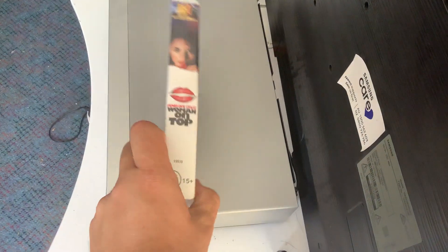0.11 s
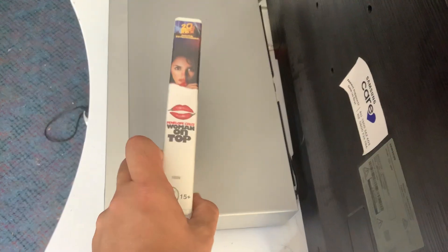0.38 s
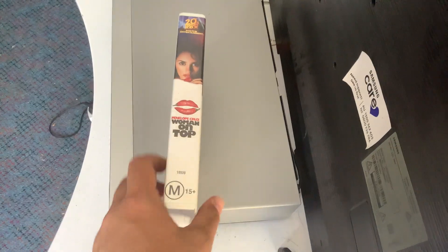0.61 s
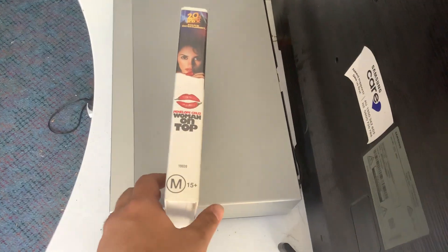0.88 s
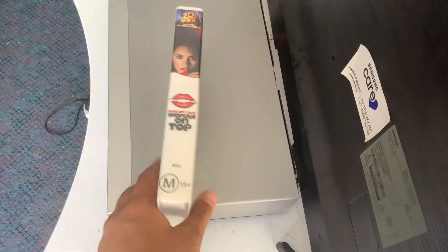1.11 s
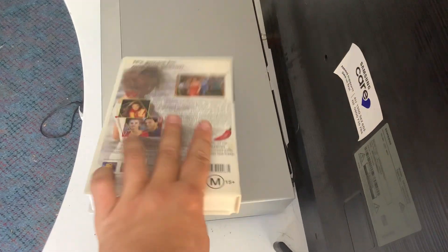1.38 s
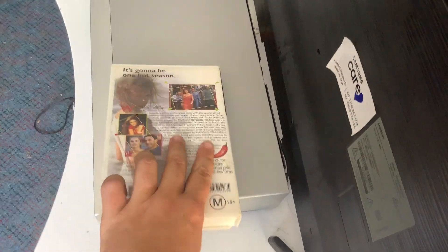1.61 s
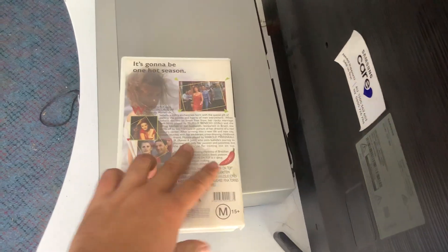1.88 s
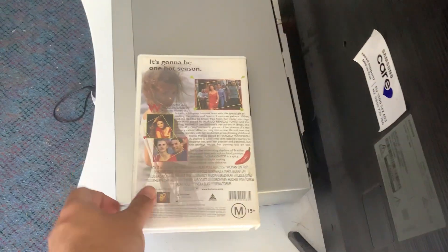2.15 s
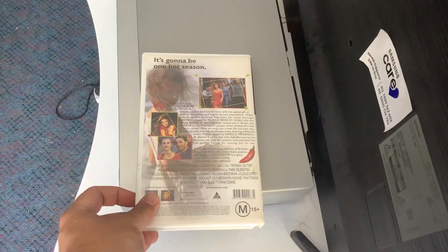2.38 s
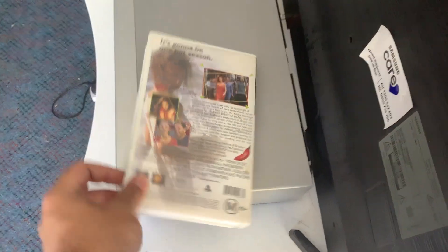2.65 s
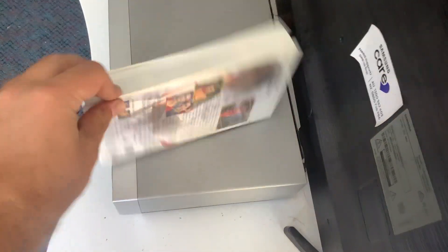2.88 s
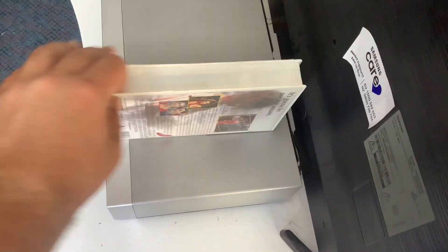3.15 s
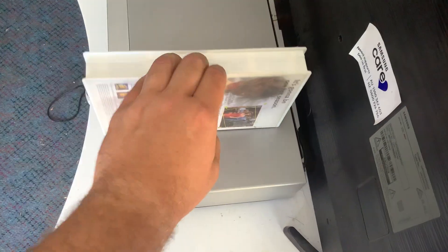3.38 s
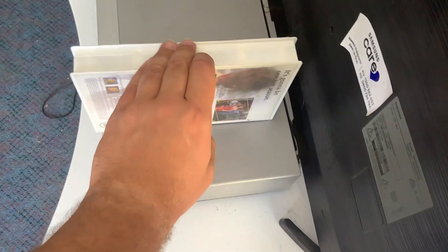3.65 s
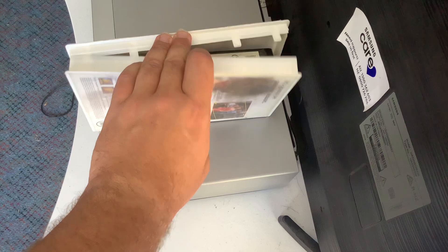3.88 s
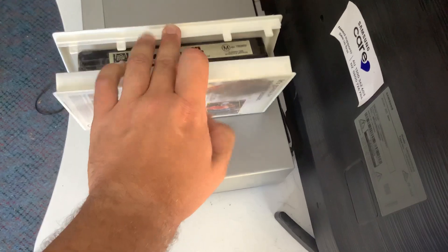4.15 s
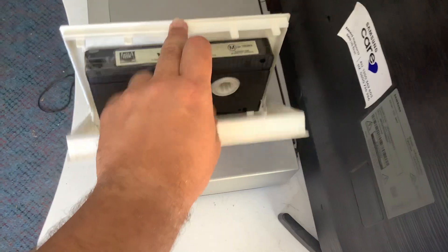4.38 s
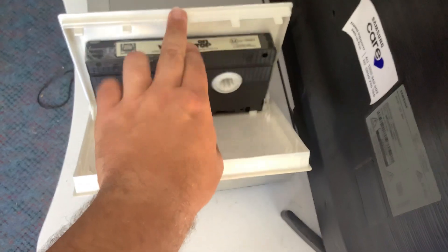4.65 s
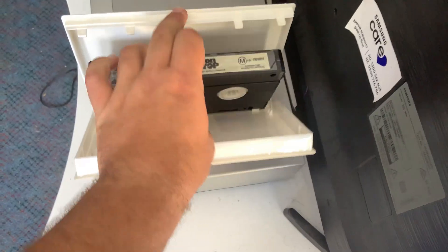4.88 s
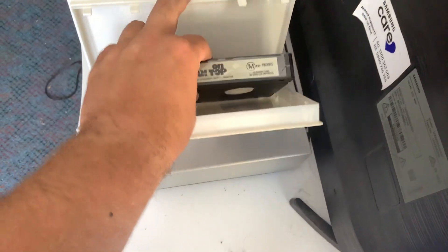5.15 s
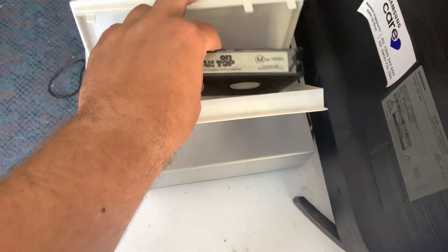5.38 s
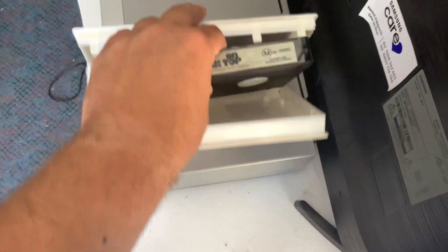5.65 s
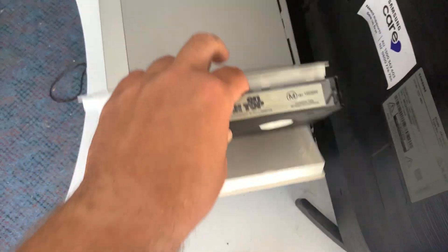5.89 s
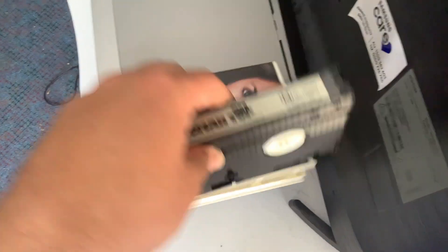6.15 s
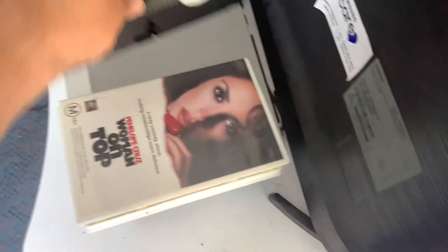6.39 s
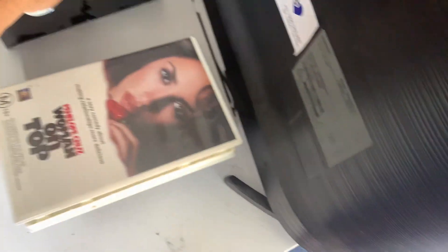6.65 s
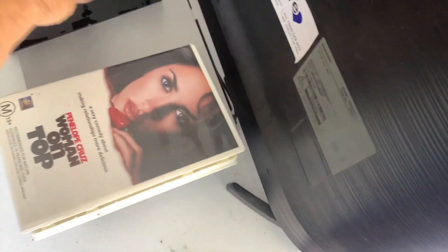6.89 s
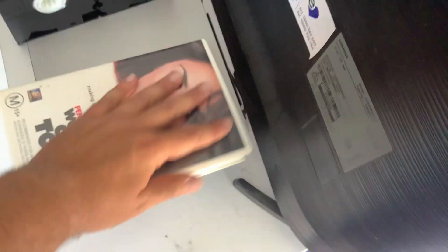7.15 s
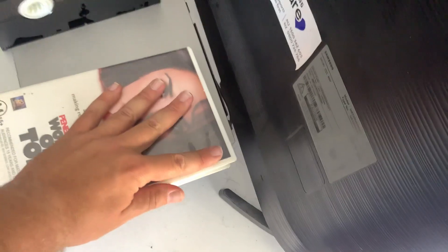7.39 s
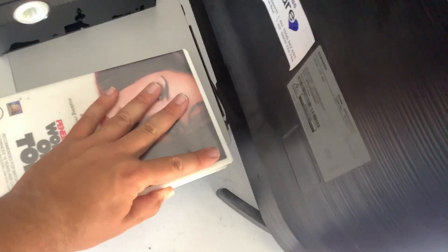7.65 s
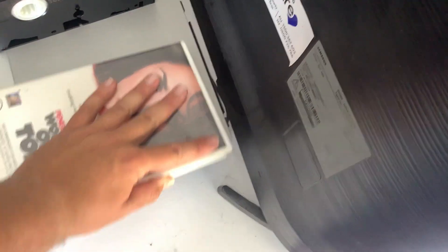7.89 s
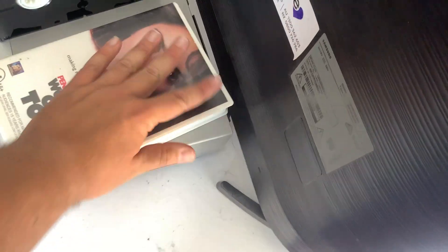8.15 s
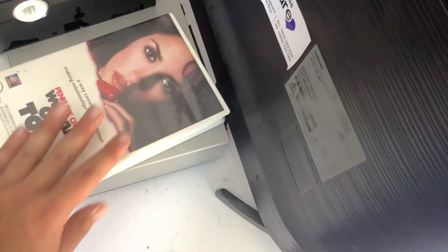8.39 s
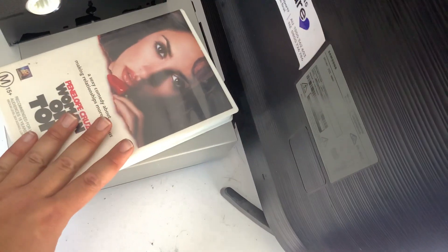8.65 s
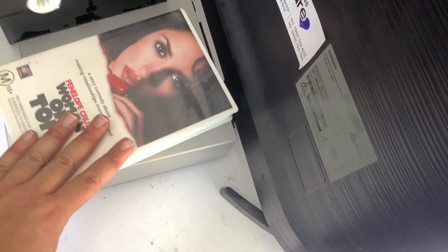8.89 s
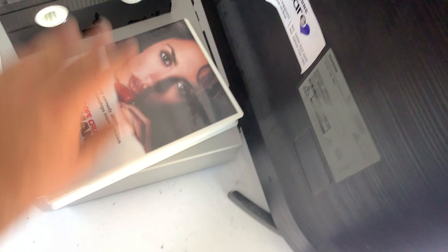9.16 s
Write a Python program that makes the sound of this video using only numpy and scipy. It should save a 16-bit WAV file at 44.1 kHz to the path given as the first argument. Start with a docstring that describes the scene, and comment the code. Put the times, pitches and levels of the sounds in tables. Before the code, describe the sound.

Close to the microphone, a hand turns a hollow plastic cassette case on a metal-cased appliance. A solid knock comes first, then soft rubs and another clack, a dense cluster of bright clacks as it is stood up and opened, light rattles, a very sharp snap as it shuts, and a few last taps. A low fan hum and faint air run throughout the small room.

```python
"""A hand turns, opens and shuts a hollow plastic cassette case on top of a metal-cased appliance in a small room.
Each contact is a short chatter of clicks that rings the hollow box low and its thin shell high.
Edges rub in between as trains of tiny catches with a hiss; snaps ring the shell, pings are treble noise.
Heavy landings shake the panel below with a few low, decaying tones, and the room answers with noise that dies away.
A fan nearby hums on a few wavering near-sines over a steady rush of air made of shaped noise."""
import sys
import numpy as np
from scipy import signal
from scipy.fft import rfft, irfft
from scipy.io import wavfile

SR = 44100
rng = np.random.default_rng(int(sys.argv[2]) if len(sys.argv) > 2 else 0)


def store_wav(level_fs):
    """Save 16-bit WAV to argv[1]."""
    pcm = np.round(np.clip(np.atleast_2d(level_fs), -1, 1) * 32767)
    wavfile.write(sys.argv[1], SR, pcm.T.astype(np.int16))


N = 409248   # length of the scene in samples


def from_db(db):
    """Gain of a level in dB."""
    return 10 ** (np.asarray(db) / 20)


def rms_one(x):
    """Scaled to rms 1."""
    return x / np.sqrt(np.mean(x ** 2) + 1e-20)


def peak_one(x):
    """Scaled to peak 1."""
    return x / np.max(np.abs(x))


def energy_one(x):
    """Scaled so that the first 30 ms have rms 1."""
    return x / np.sqrt(np.mean(x[:round(.03 * SR)] ** 2) + 1e-20)


def high_pass(x, hz):
    """Steep cut of the bass."""
    return signal.sosfilt(signal.butter(4, hz, "high", fs=SR, output="sos"), x)


def drift(rate_hz):
    """Random wandering of spread 1: noise at every 40th sample, smoothed twice; a higher rate wanders faster."""
    r = np.exp(-80 * np.pi * rate_hz / SR)
    coarse = rng.standard_normal(N // 40 + 2002)
    slow = signal.lfilter([1], [1, -2 * r, r * r], coarse)[2000:]   # leave out the filter's start
    return np.interp(np.arange(N) / 40, np.arange(len(slow)), rms_one(slow))


def coloured(x, spectrum):
    """Shapes a sound by a spectrum read on a log-frequency axis."""
    hz, db = np.transpose(spectrum)
    grid = np.maximum(np.arange(len(x) // 2 + 1) * SR / len(x), 1)
    gain = from_db(np.interp(np.log(grid), np.log(hz), db))
    return irfft(rfft(x) * gain, len(x))


def rings(modes, size):
    """One decaying sine a row, the way a struck body sounds at each of its own pitches."""
    t = np.arange(size) / SR
    return np.array([from_db(db - 60 * t / t60) * np.sin(2 * np.pi * hz * t) for hz, db, t60 in modes])


def favoured(modes, pitch_hz, focus_db, size):
    """The sum of the modes, those far from the pitch weaker by focus_db an octave."""
    octaves_off = np.abs(np.log2(np.array(modes)[:, 0] / pitch_hz))
    return from_db(-focus_db * octaves_off) @ rings(modes, size)


# colour of the rushing air: (frequency [Hz], level [dB])
AIR_COLOUR = [(25, -37), (42, -18), (60, 10.5), (72, -8.5), (130, -11.5), (200, -8.5), (300, -6), (450, -7),
              (600, -9), (870, -15.5), (2100, -17), (3000, -21), (5000, -28.5), (16000, -35.5)]
AIR_DB = -53.5   # rms level around which the rush drifts a little


def air():
    """The steady rush of moving air and the room: shaped noise."""
    rush = rms_one(coloured(rng.standard_normal(N), AIR_COLOUR))
    return from_db(AIR_DB + 0.12 * drift(0.6)) * rush


# fan, as the microphone moves about:
# (time [s], blade rate [Hz], hum level before the line levels [dB], tilt [dB per octave])
FAN_COURSE = [(0, 85.9, -61, -2.5), (1.1, 84.8, -60, -1), (2.4, 85.93, -59, -0.5),
              (4.9, 84.08, -59.5, -2.5), (6.5, 85.76, -61, -4.5), (8.35, 84.86, -61, -7),
              (9.28, 86.7, -61, -5.5)]
# lines of the hum: (multiple of the blade rate, level relative to the hum [dB])
FAN_LINES = [(1, -2.5), (2, -0.5), (3, -8.5), (4, 4.5), (6, -12), (7, -5.5)]


def fan(waver_hz=0.343, flutter_db=2.0):
    """Near-sines on multiples of the blade rate, sharing one waver in pitch, each fluttering on its own."""
    s, *columns = np.transpose(FAN_COURSE)
    hz, hum_db, tilt_db = [np.interp(np.arange(N) / SR, s, c) for c in columns]
    phase = 2 * np.pi * np.cumsum(hz + waver_hz * drift(4.18)) / SR
    hum = np.zeros(N)
    for multiple, db in FAN_LINES:
        tilted_db = tilt_db * np.log2(multiple / 2)   # the tilt turns about the second line
        line_db = hum_db + db + tilted_db + flutter_db * drift(2.7)
        sine = np.sin(multiple * phase + rng.uniform(0, 2 * np.pi))
        hum += np.sqrt(2) * from_db(line_db) * sine
    return hum


ROOM_T60_S, WALL_CUT_HZ = 0.33, 1700   # time to die by 60 dB; above the cut the echoes die faster
ROOM_DB = -8.5


def room(x, swell_s=0.00066, treble_share=0.61):
    """Dense reflections from near, cluttered surfaces: noise that swells in and dies, its treble faster."""
    t = np.arange(SR // 2) / SR
    shape = (1 - np.exp(-t / swell_s)) * from_db(-60 * t / ROOM_T60_S)
    answer = rng.standard_normal(len(t)) * shape
    lows = signal.sosfilt(signal.butter(1, WALL_CUT_HZ, fs=SR, output="sos"), answer)
    extra_fade = from_db(-60 * t / ROOM_T60_S * (1 / treble_share - 1))
    answer = lows + (answer - lows) * extra_fade
    return signal.fftconvolve(x, answer / np.sqrt(np.sum(answer ** 2)))[:N]


# heavy landings that shake the panel below: (time [s], peak level before the bass cut [dB], pitch [Hz])
LANDINGS = [(0.254, -23.5, 143), (1.529, -35, 110), (3.104, -32, 130), (3.822, -32, 142), (3.921, -32, 120),
            (3.944, -23, 110), (3.995, -29, 110), (6.715, -34, 110), (7.249, -34, 130), (7.638, -25.5, 190),
            (8.85, -30.5, 206)]
# lowest tones of the panel: (frequency [Hz], level [dB], time to die by 60 dB [s])
PANEL_MODES = [(83, -3, 0.15), (110, 17.5, 0.42), (144.4, 25, 0.19), (207.4, 26, 0.23)]


def thumps(soft_ms=1.0):
    """A slow push sets the panel's lowest modes going."""
    t_ms = np.arange(1500) / SR * 1000
    push = t_ms * np.exp(-t_ms / soft_ms)
    out = np.zeros(N + SR)
    for s, db, pitch_hz in LANDINGS:
        panel = favoured(PANEL_MODES, pitch_hz, focus_db=17.5, size=12000)
        thud = peak_one(np.convolve(panel, push))
        at = round(s * SR)
        out[at:at + len(thud)] += from_db(db) * thud
    return high_pass(out[:N] + 1e-18, 25)


# tiny treble ticks, likely nails and latch pegs letting go: (time [s], noise level before filtering [dB])
PING_TIMES = [(3.047, -26.5), (3.099, -15), (3.778, -29), (3.818, -22), (3.92, -26), (4.351, -44),
              (4.373, -42), (7.223, -37), (6.698, -9.5), (6.711, -30), (8.193, -31), (9.113, -44)]
PING_LOW_HZ, PING_HIGH_HZ = 5500, 10000   # edges of the band kept
PING_T60_S, PING_RISE_S = 0.022, 0.0022


def pings():
    """Each is a brief burst of treble noise with a quick rise and decay."""
    size = 1500
    t = np.arange(size) / SR
    shape = (1 - np.exp(-(t / PING_RISE_S) ** 2)) * from_db(-60 * t / PING_T60_S)
    out = np.zeros(N + size)
    for s, db in PING_TIMES:
        at = round(s * SR)
        out[at:at + size] += from_db(db) * shape * rng.standard_normal(size)
    softened = signal.sosfilt(signal.butter(2, PING_HIGH_HZ, fs=SR, output="sos"), out[:N] + 1e-18)
    return high_pass(softened, PING_LOW_HZ)


# tones of the thin plastic shell: (frequency [Hz], level [dB])
SHELL_TONES = [(810, 0), (980, 11.5), (1140, 11.5), (1370, 9), (1550, 11.5), (1720, 5.5), (1940, 6.5),
               (2170, 7), (2400, 6), (2690, 5.5), (2980, 1), (3200, -24), (4250, -7.5)]
SHELL_T60_S = .011


def shell_modes():
    """The shell's modes are all damped alike."""
    return [(hz, db, SHELL_T60_S) for hz, db in SHELL_TONES]


# a hard edge snaps once and rings the shell near the struck place: (time [s], peak level [dB], pitch [Hz])
SNAP_TIMES = [(3.104, -24, 4250), (4.082, -25.5, 2380), (5.298, -30, 954), (5.352, -29, 2900),
              (5.731, -30, 970), (5.944, -43, 2210), (5.974, -33.5, 1440), (6.149, -17.5, 1880),
              (6.7, -13, 2900), (6.714, -21, 1360), (7.257, -31, 2900), (7.269, -31, 2580),
              (7.637, -16, 1700), (7.637, -26, 2880), (7.741, -46, 2750), (7.986, -27.5, 1100),
              (8.848, -23, 1140), (8.848, -24.5, 1930)]
SNAP_T60_S, SNAP_RISE_MS = 0.012, 1.0
SNAP_ROOM_DB = -9   # a snap faces the microphone and feeds the room less


def snaps():
    """One clean click each, ringing mainly the few shell modes next to its pitch, all set equally loud."""
    size = 2000
    modes = [(hz, 0, SNAP_T60_S) for hz, _ in SHELL_TONES]
    rise = 1 - np.exp(-(np.arange(size) / SR * 1000 / SNAP_RISE_MS) ** 2)
    out = np.zeros(N + size)
    for s, db, pitch_hz in SNAP_TIMES:
        click = peak_one(rise * favoured(modes, pitch_hz, focus_db=34, size=size))
        at = round(s * SR)
        out[at:at + size] += from_db(db) * click
    return out[:N]


# strokes of edges and fingers: (start [s], peak [s], end [s], level at the peak [dB],
# hardness [dB], pitch of the rubbed place [Hz])
RUB_STROKES = [(1.197, 1.228, 1.48, -43, -7.5, 600), (1.684, 1.838, 2.05, -44, -1, 798),
               (1.832, 1.86, 1.875, -66, 17.5, 1500), (2.618, 2.84, 2.95, -47, 0.5, 800),
               (2.826, 2.87, 2.875, -58, 15, 2240), (2.887, 2.932, 3.2, -51.5, 3.5, 1500),
               (3.433, 3.532, 3.6, -56, -8, 500), (4.504, 4.55, 4.57, -55.5, -0.5, 1100),
               (4.592, 4.633, 4.635, -90, 22.5, 1500), (5.75, 5.916, 5.93, -45.5, 1, 1300),
               (5.91, 6.038, 6.15, -46.5, -1, 1300), (7.488, 7.526, 7.58, -49, 1.5, 800),
               (7.956, 7.964, 8.02, -64, 17, 1300), (7.948, 8.03, 8.17, -58.5, 18, 3000)]
# how far a stroke's light ends lie under its peak, less in short strokes: (hollow [dB], shell [dB], hiss [dB])
LIGHT_ENDS_DB = (-13, -21, -26)
# colour of the rubbing hiss: (frequency [Hz], level [dB])
HISS_COLOUR = [(2500, -1.5), (3500, 0.5), (4250, 2), (5400, -8), (6650, 3), (7700, -8.5), (9000, -0.5),
               (10500, -8.5), (16000, -11)]
HISS_DB, HISS_PER_HARDNESS = -15.5, 1.72   # hiss against the box, and its growth in dB per dB of hardness
TOUCH_S, LIFT_OFF_S = 0.014, 0.049   # a stroke sets in faster than it lifts off
HOLD = 0.72            # exponent that bends the swell of the pressure
FULL_STROKE_S = 0.3    # shorter strokes keep their pressure more evenly
GRIT_DB = 1.8          # the hiss of a slide comes in quick lumps


def rubbing(grains_per_s=3500, size_db=3.5, lumpy_db=1.3):
    """Dense tiny catches of a sliding edge excite the modes near the rubbed place and hiss."""
    t = np.arange(N) / SR
    sizes = from_db(size_db * np.minimum(rng.exponential(1, N), 4))
    grains = (rng.random(N) < grains_per_s / SR) * sizes
    grains *= rng.choice([-1, 1], N) * from_db(lumpy_db * drift(25.0))
    gritty = (grains + 7.2 * rng.standard_normal(N)) * from_db(GRIT_DB * drift(100))
    hiss = rms_one(coloured(gritty, HISS_COLOUR))
    out = np.zeros(N)
    for start, peak, end, db, hardness_db, pitch_hz in RUB_STROKES:
        span = slice(round((start - .2) * SR), round((end + .2) * SR))
        now = t[span]
        bodies = []
        for modes in (HOLLOW_MODES, shell_modes()):
            body = favoured(modes, pitch_hz, focus_db=2.5, size=8000)
            bodies.append(rms_one(signal.fftconvolve(grains[span], body)[:len(now)]))
        box, shell = bodies
        # pressure swells to the peak and eases off
        lightness = np.interp(now, [start, peak, end], [1, 0, 1]) ** HOLD
        lightness *= min((end - start) / FULL_STROKE_S, 1)
        # sets in just ahead of the start, lifts off after the end
        fade = np.clip(np.minimum((now - start) / TOUCH_S, (end - now) / LIFT_OFF_S) + 1, 0, 1)
        layers = high_pass(box, 79), shell, hiss[span]
        peaks_db = db, db + hardness_db, db + HISS_DB + HISS_PER_HARDNESS * hardness_db
        for layer, peak_db, ends_db in zip(layers, peaks_db, LIGHT_ENDS_DB):
            out[span] += layer * from_db(peak_db + ends_db * lightness) * fade
    return out


# touches of the case: (time [s], knock level before the final trim [dB], hardness [dB],
# knock pitch [Hz], chatter length [ms])
TOUCHES = [(0.253, -14, -6, 316, 15.8), (0.353, -29, -6, 604, 5.4), (0.676, -47, -3, 450, 4.8),
           (0.684, -37.5, -6.5, 594, 2.2), (1.204, -45, -4.5, 368, 4), (1.227, -30.5, -12, 358, 7),
           (1.273, -37.5, -7.5, 360, 7.2), (1.52, -27, 0, 400, 13.3), (1.528, -16, -9.5, 390, 11),
           (1.556, -28, -5, 350, 6.6), (1.826, -21, -5.5, 434, 14.1), (1.879, -31, -5, 570, 2.8),
           (2.89, -33, -31, 304, 5.4), (2.994, -37.5, -20, 298, 5), (3.044, -25, -6, 356, 13.5),
           (3.064, -27, -6, 282, 6.3), (3.102, -11.5, -7, 422, 7.33), (3.127, -28.5, -3.5, 496, 10),
           (3.176, -45, -1, 393, 6.8), (3.254, -45, -15, 396, 7.8), (3.549, -45, -5, 342, 4.6),
           (3.777, -37.5, 0, 550, 9.3), (3.818, -35, 0.5, 540, 3.8), (3.829, -27, -11, 434, 5.9),
           (3.857, -26.5, -10, 470, 4), (3.922, -24.5, -5.5, 253, 8.7), (3.942, -30.5, -3.5, 382, 9.9),
           (3.995, -35.5, -1, 375, 12.5), (4.015, -37, -4, 382, 4.2), (4.08, -28.5, -0.5, 457, 5.7),
           (4.354, -52, -1, 298, 7.2), (4.375, -45, -8, 353, 7.1), (4.522, -52, -10, 337, 3),
           (5.101, -52, 4, 353, 9.3), (5.184, -50, 0, 340, 7.5), (5.228, -44, -0.5, 568, 6.8),
           (5.253, -48.5, 0, 397, 7.6), (5.275, -49, -2, 400, 6.9), (5.294, -35, 6, 423, 10.7),
           (5.35, -37.5, 8.5, 574, 6.57), (5.731, -37, 3.5, 490, 3.3), (5.877, -44, 2.5, 288, 15),
           (5.911, -39, -3.5, 304, 2.1), (5.938, -36.5, -5, 505, 1.6), (5.972, -34.5, -10.5, 495, 4.2),
           (5.99, -41, -7, 500, 4.1), (6.071, -41, -3, 490, 9.6), (6.127, -42.5, 12, 383, 14.8),
           (6.138, -36, 10, 324, 6.5), (6.149, -33.5, 7, 392, 9.8), (6.693, -37, 0, 480, 3.5),
           (6.7, -28.5, 4, 420, 3.13), (6.712, -16.5, -0.5, 355, 7.1), (6.948, -38.5, -8.5, 574, 2.3),
           (7.116, -40, -3.5, 626, 6.9), (7.222, -45, -4, 571, 10.3), (7.244, -26.5, -3.5, 674, 5.5),
           (7.258, -28, -5.5, 554, 5.4), (7.269, -32, -2.5, 440, 4.2), (7.31, -38, -8, 420, .8),
           (7.483, -38.5, -6.5, 740, 7.1), (7.552, -43.5, -13, 700, 4.6), (7.637, -22.5, -3.5, 388, 0.98),
           (7.743, -44, -3.5, 347, 3), (7.984, -57, 20.5, 548, 8.2), (8.049, -35.5, -19, 424, 9.7),
           (8.533, -40.5, -13, 334, 3.1), (8.847, -26.5, -3.5, 245, 3), (9.095, -52.5, -3, 495, 9.8)]
# tones of the hollow box, rubbed as well: (frequency [Hz], level [dB], time to die by 60 dB without the grip [s])
HOLLOW_MODES = [(241.6, 0.5, 0.18), (253.3, -3, 0.36), (282, -2, 0.21), (329.2, 6.5, 0.1),
                (363.4, 12, 0.043), (377, -7, 0.17), (405, 9.5, 0.036), (486, 9, 0.036), (538.5, 4.5, 0.12),
                (574, -9, 0.12), (593, 16.5, 0.027), (740, 3.5, 0.077)]
# colour of the bright tick: (frequency [Hz], level [dB])
TICK_COLOUR = [(2500, -1.5), (3500, 6), (5200, -1), (8500, -3.5), (16000, -22)]
# a harder contact rings the shell louder than the box by its hardness; the tick grows faster still,
# and with strength
TICK_DB, TICK_PER_HARDNESS, TICK_PER_STRENGTH, USUAL_KNOCK_DB = -14, 2.09, 0.45, -31.5
TICK_FADE_MS = 110     # extra fade of the tick through a long chatter
GRIP_DB_PER_S = 300    # the holding hand damps the box


def contacts(clicks_per_ms=8.0, focus_db=8.0, soft_ms=0.24, rise_share=0.3512, tick_t60=0.012, quiet_share=0.6,
             first_push=0.85, hard_tilt=0.75, usual_db=-5, snap=0.1):
    """A chatter of clicks rings box and shell; the struck place favours the box modes near its pitch."""
    size = int(SR * .4)
    t_ms = np.arange(size) / SR * 1000
    out = np.zeros(N + size)
    hollow = rings(HOLLOW_MODES, size) * from_db(-GRIP_DB_PER_S * t_ms / 1000)
    shell = rings(shell_modes(), size)
    octaves = np.log2(np.array(HOLLOW_MODES)[:, 0])
    shell_octaves = np.log2(np.array(SHELL_TONES)[:, 0] / 1500)
    # the heavy box answers a rounded push, so the knock swells later
    push = t_ms * np.exp(-t_ms / soft_ms)
    tick_decay = from_db(-120 * t_ms / 1000 / tick_t60)   # of the power, hence twice 60 dB
    for s, knock_db, hardness_db, pitch_hz, length_ms in TOUCHES:
        shell_db = knock_db + hardness_db
        tick_db = knock_db + TICK_DB + TICK_PER_HARDNESS * hardness_db
        tick_db += TICK_PER_STRENGTH * (knock_db - USUAL_KNOCK_DB)
        # each contact strikes every mode a little differently
        strengths = from_db(2 * rng.standard_normal(len(hollow) + len(shell)))

        # a long, soft contact also builds up slowly
        rise_ms = max(rise_share * length_ms, .3)
        landing = round(rise_ms * SR / 1000)
        press = (1 - np.exp(-((t_ms + 0.031) / rise_ms) ** 2)) * np.exp(-t_ms / length_ms)
        clicks = (rng.random(size) < clicks_per_ms * 1000 / SR) * rng.standard_normal(size)
        chatter = clicks * press

        blow = chatter / np.sqrt(np.sum(chatter ** 2) + 1e-12)
        blow[landing] += first_push   # the landing itself stands out of the chatter
        near = from_db(-focus_db * np.abs(octaves - np.log2(pitch_hz))) * strengths[:len(hollow)]
        near *= rng.choice([-1, 1], len(hollow))   # random signs keep the knock from bunching into one peak
        knock = signal.fftconvolve(blow, np.convolve(near @ hollow, push[:400]))[:size]
        knock = high_pass(knock, quiet_share * pitch_hz)   # a small box radiates little below its pitch

        burst = signal.fftconvolve(chatter ** 2, tick_decay)[:size]
        tick = coloured(rng.standard_normal(size), TICK_COLOUR) * np.sqrt(np.maximum(burst, 0))
        tick *= np.exp(-t_ms / TICK_FADE_MS)

        chatter[landing] += snap * np.sqrt(np.sum(chatter ** 2))   # the edge snaps once
        # a hard contact lifts the upper shell modes
        bright = from_db(hard_tilt * (hardness_db - usual_db) * shell_octaves) * strengths[len(hollow):]
        ring = high_pass(signal.fftconvolve(chatter, bright @ shell)[:size], 302)

        # the pressure starts to build just ahead of the landing
        at = round((s - .5 * rise_ms / 1000) * SR)
        out[at:at + size] += from_db(knock_db - 4.5) * energy_one(knock)
        out[at:at + size] += from_db(shell_db - 8.5) * energy_one(ring)
        out[at:at + size] += from_db(tick_db - 5.0) * energy_one(tick)
    return out[:N]


def scene():
    """The handled case with its room, over panel thumps, fan and air."""
    case = contacts() + rubbing() + pings()
    clicks = snaps()
    echoes = from_db(ROOM_DB) * room(case + from_db(SNAP_ROOM_DB) * clicks)
    return (case + clicks + echoes + thumps() + fan() + air())[None]


def band_limit(x):
    """A steep low-pass at the top of the band."""
    return signal.sosfilt(signal.butter(12, 15900, fs=SR, output="sos"), x)


# colour of the microphone and its port: (frequency [Hz], level [dB])
MICROPHONE_COLOUR = [(2400, -1.5), (3050, -3), (3500, -9), (4250, -2.5), (4800, -6), (5400, -11),
                     (6650, -4), (7800, -9.5), (9300, -6.5), (10600, -9.5), (11900, -4.5), (13000, -8),
                     (14100, -3.5), (15500, -6)]


def record(dry):
    """The microphone port colours the treble, the deepest bass is cut and peaks are rounded."""
    x = high_pass(coloured(dry[0], MICROPHONE_COLOUR), 61.3)[None]
    top = 0.27   # peaks bend smoothly towards this level
    mix = top * np.tanh(x / top)
    return band_limit(mix)


dry = scene()
out = record(dry)
store_wav(out)
```